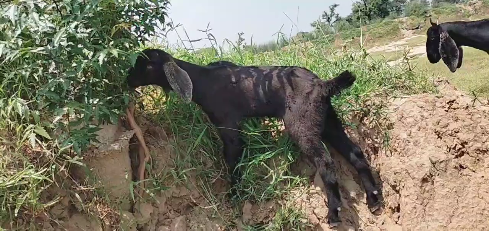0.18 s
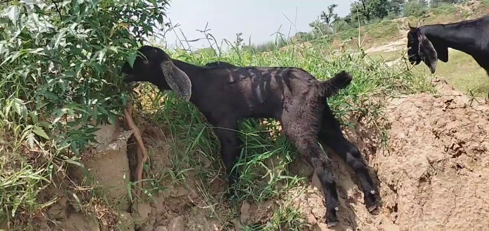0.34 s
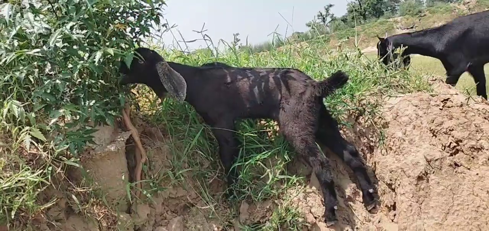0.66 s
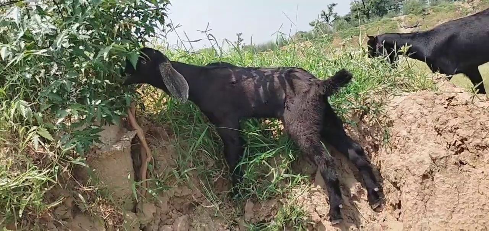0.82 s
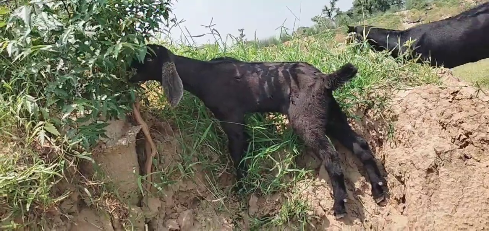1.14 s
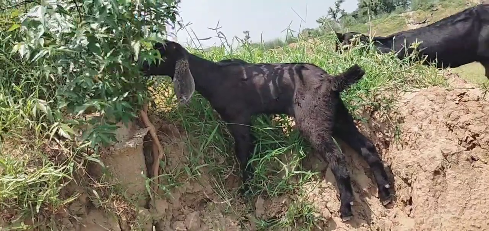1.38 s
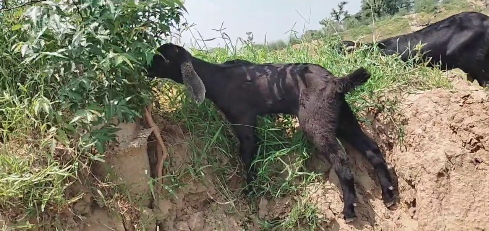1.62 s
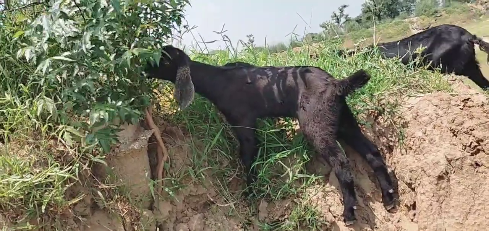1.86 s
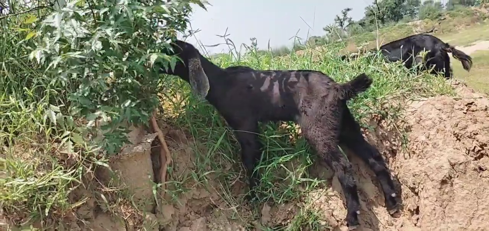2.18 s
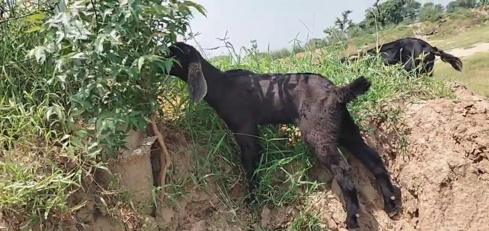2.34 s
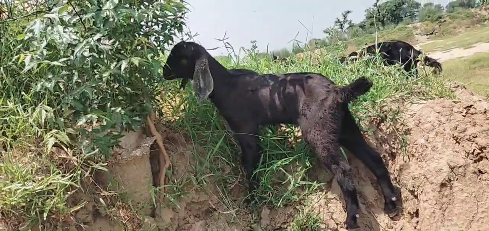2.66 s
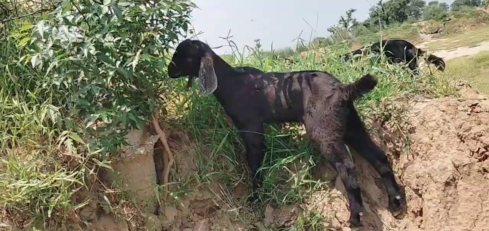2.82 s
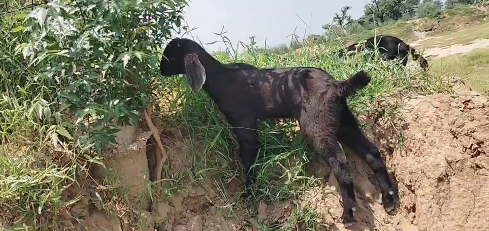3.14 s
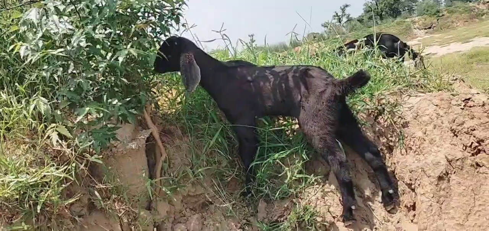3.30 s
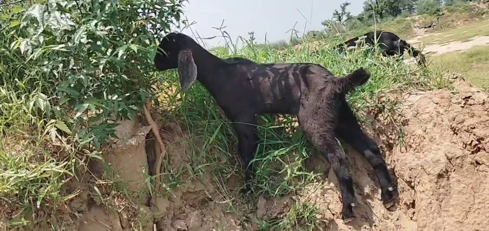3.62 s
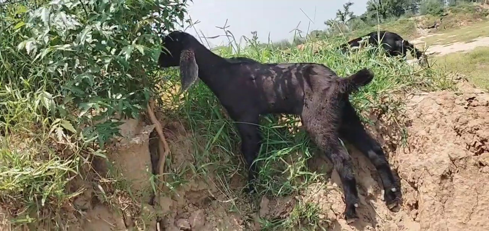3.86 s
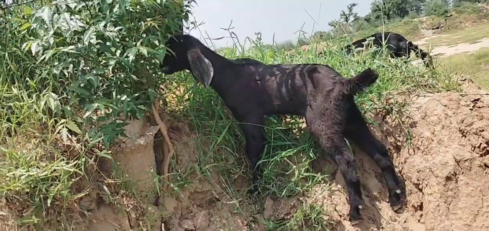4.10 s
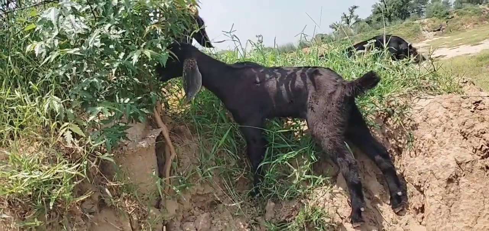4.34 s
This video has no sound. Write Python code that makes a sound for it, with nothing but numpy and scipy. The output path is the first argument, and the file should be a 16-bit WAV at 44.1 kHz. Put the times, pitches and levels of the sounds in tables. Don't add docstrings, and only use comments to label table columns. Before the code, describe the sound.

Leaves crackle and twigs snap as a goat browses, with one fluttering sneeze, a softer snort later, and thin bird whistles in quiet open air.

```python
import sys
import numpy as np
from scipy import signal
from scipy.io import wavfile
from scipy.ndimage import uniform_filter1d

SR = 44100
rng = np.random.default_rng(int(sys.argv[2]) if len(sys.argv) > 2 else 0)


def to_linear_factor(level_db):
    exponent = np.asarray(level_db, float) / 20
    return 10 ** exponent


def transcribe(signal):
    frames = np.atleast_2d(signal).T
    limited = np.clip(frames, -1, 1)
    pcm = np.round(limited * 32767).astype(np.int16)
    wavfile.write(sys.argv[1], SR, pcm)


N = 197656


def rms_one(x):
    return x / np.sqrt(np.mean(x ** 2) + 1e-20)


def highpass(x, hz):
    return signal.sosfilt(signal.butter(2, hz, "high", fs=SR, output="sos"), x)


def in_time(rows):
    s, *columns = np.transpose(rows)
    return [np.interp(np.arange(N) / SR, s, column) for column in columns]


def drift(rate_hz):
    r = np.exp(-80 * np.pi * rate_hz / SR)
    chance = rng.standard_normal(N // 40 + 2002)
    slow = signal.lfilter([1], [1, -2 * r, r * r], chance)[2000:]
    return np.interp(np.arange(N) / 40, np.arange(len(slow)), rms_one(slow))


def resonate(x, hz, width_hz):
    r = np.exp(-np.pi * width_hz / SR)
    top = (1 - r * r) / 2 * np.array([1, 0, -1])
    return signal.lfilter(top, [1, -2 * r * np.cos(2 * np.pi * hz / SR), r * r], x)


def bands(sources, spectrum):
    edges = 30 * 2 ** np.arange(0, 9.2, 1 / 3)
    hz, level_db = np.transpose(spectrum)
    for k, (low, high) in enumerate(zip(edges, edges[1:])):
        centre = np.sqrt(low * high)
        if hz[0] < centre < hz[-1]:
            part = signal.sosfilt(signal.butter(2, [low, high], "band", fs=SR, output="sos"), sources[k % 2])
            yield to_linear_factor(np.interp(np.log(centre), np.log(hz), level_db)) * part


def add(out, s, x):
    i = round(s * SR)
    out[i:i + len(x)] += x[:N - i]


# pitch in Hz, level in dB per Hz.
AIR_SPECTRUM = [(18, -44), (30, -7.5), (112, 5.5), (355, -3.5), (461, -3.5), (2120, -4), (2750, -11),
                (4190, -8.5), (6050, -23), (8080, -17.5), (11400, -28), (14800, -21.5), (16000, -27)]


def air():
    noise = rng.standard_normal((2, N))
    return to_linear_factor(-71.5) * rms_one(sum(to_linear_factor(1.36 * drift(24.0)) * x for x in bands(noise, AIR_SPECTRUM)))


# time in seconds, level in dB.
INSECT_LEVEL = [
    (0, -88),
    (.75, -95),
    (.9, -77.5),
    (1.5, -89),
    (2.55, -87.5),
    (2.75, -76.5),
    (3.55, -78.5),
    (3.72, -89),
    (4.48, -82),
]


def insects():
    level_db, = in_time(INSECT_LEVEL)
    level_db = level_db + 1.0 + 0.5 * drift(2.5)
    hiss = resonate(resonate(rng.standard_normal(N), 8240, 1500), 8360, 2100)
    return to_linear_factor(level_db) * rms_one(hiss)


def whistle(rows, overtones=(), rough=0.37, fade_s=0.003, trill=0):
    s, hz, level_db = np.transpose(rows)[:3]
    t = np.arange(s[0], s[-1], 1 / SR)
    waver, shake = (rms_one(uniform_filter1d(rng.standard_normal(len(t)), size=150)) for k in range(2))
    pitch_hz = np.interp(t, s, hz) * (1 + 0.025 * rough * waver)
    phase = 2 * np.pi * np.cumsum(pitch_hz) / SR
    tone = np.sin(phase) + sum(to_linear_factor(db) * np.sin(k * phase) for k, db in overtones)
    pulse = 1 - trill * np.cos(2 * np.pi * 85 * (t - s[0]))
    fade = np.clip(np.minimum(t - s[0], s[-1] - t) / fade_s, 0, 1)
    return np.sqrt(2) * to_linear_factor(np.interp(t, s, level_db)) * tone * (1 + rough * shake) * pulse * fade


def slide(length, from_hz, to_hz, db, change_db):
    u = np.linspace(0, 1, num=30)
    hz = to_hz + (from_hz - to_hz) * np.exp(-u / 0.223)
    return np.transpose([length * u, hz, db + change_db * (u - 0.5)])


# start in seconds,
# length in seconds, first pitch in Hz, last pitch in Hz, level in dB.
STRAIGHT_GLIDES = [(0.087, 0.05, 4060, 3780, -68.5), (0.092, 0.059, 2055, 2025, -70),
                   (0.139, 0.012, 4400, 3920, -64.5), (.149, 0.014, 4270, 4050, -67),
                   (0.055, .022, 4810, 3600, -73), (0.059, 0.015, 4700, 4750, -72),
                   (0.076, 0.0086, 3950, 4230, -63), (0.112, 0.015, 4710, 4470, -67),
                   (0.168, 0.018, 5250, 5050, -76), (.307, .011, 4650, 4750, -73), (.337, 0.014, 4700, 4550, -81),
                   (0.416, .018, 3990, 3450, -68), (0.442, .02, 5350, 4950, -66), (.55, .012, 4670, 4800, -71),
                   (0.746, 0.027, 4600, 3450, -72.5), (0.781, 0.021, 4560, 5100, -74),
                   (0.804, .044, 1405, 1497, -69), (0.83, 0.047, 5900, 5700, -77),
                   (0.416, 0.022, 4420, 4120, -64), (0.452, 0.014, 3990, 4800, -63), (0.83, .03, 3900, 3350, -73),
                   (1.02, .033, 4580, 4820, -74), (1.721, 0.018, 4400, 4400, -74), (1.645, 0.02, 4750, 4830, -83),
                   (1.67, 0.014, 5450, 5750, -86), (1.756, .018, 5300, 4900, -80),
                   (2.032, 0.013, 5400, 5100, -73), (2.164, 0.014, 3880, 4270, -74),
                   (3.626, 0.025, 2834, 2080, -67), (3.735, 0.1, 2040, 2203, -74),
                   (3.993, .025, 1850, 1820, -60.5), (4.046, 0.087, 2920, 2830, -69),
                   (4.122, .034, 1794, 1790, -65), (4.197, 0.02, 4130, 3880, -64),
                   (4.223, 0.013, 5170, 4200, -65), (4.234, .03, 4960, 4720, -69), (4.31, 0.021, 2700, 5000, -73),
                   (4.324, 0.014, 2430, 3580, -71), (3.433, 0.032, 2080, 2450, -70),
                   (4.378, 0.048, 5650, 4900, -78), (3.852, .045, 3300, 2900, -86)]


def straight_glides(out):
    for s, length, from_hz, to_hz, db in STRAIGHT_GLIDES:
        add(out, s, whistle([(0, from_hz, db), (length, to_hz, db)], rough=0.44, fade_s=0.0031))


# start in seconds, length in seconds, first pitch in Hz, last pitch in Hz, level in dB.
TWITTER_NOTES = [(.905, .022, 3450, 3370, -71.5), (3.455, .028, 2760, 2760, -66.5),
                 (3.266, .03, 3400, 3480, -66), (3.179, .038, 7200, 7120, -75),
                 (3.232, .046, 7150, 7280, -73), (4.222, .014, 3250, 3150, -72),
                 (2.048, .018, 3700, 3400, -71), (1.1, .011, 4570, 4650, -70),
                 (2.353, .0083, 4600, 4700, -75), (2.622, .027, 4700, 4800, -74),
                 (4.113, .01, 4850, 4850, -69), (4.383, .012, 4950, 4900, -75),
                 (4.468, .012, 4200, 4050, -66), (3.669, .05, 3000, 3770, -72),
                 (4.147, .04, 5600, 3880, -72)]
# start in seconds, length in seconds, foot pitch in Hz, top pitch in Hz, level in dB.
ARCHED_NOTES = [
    (1.534, 0.051, 5340, 5800, -80),
]


def twitter(out):
    for s, *call in TWITTER_NOTES:
        add(out, s, whistle(slide(*call, change_db=3.5), rough=0.27))
    u = np.linspace(0, 1, num=30)
    for s, length, foot_hz, top_hz, db in ARCHED_NOTES:
        hz = top_hz - (top_hz - foot_hz) * np.abs(2 * u - 1) ** 2.6
        add(out, s, whistle(np.transpose([length * u, hz, db + 0 * u]), rough=0.46, fade_s=0.0034))


# time in seconds, pitch in Hz, level in dB.
BENT_CALLS = [
    [(.357, 5120, -74), (.374, 4010, -71), (.388, 3930, -78), (.402, 3960, -63), (.409, 3650, -60)],
    [(.407, 4410, -64), (.416, 5510, -68), (.434, 5610, -69), (.441, 5100, -63), (.45, 3750, -57)],
    [(.482, 3500, -67), (.495, 4350, -74), (.506, 4850, -71), (.512, 4600, -64.5), (.522, 3900, -61)],
    [(1.65, 3510, -82), (1.664, 4900, -79), (1.672, 5250, -79), (1.683, 4130, -84), (1.71, 4060, -77),
     (1.716, 3800, -78)],
    [(.925, 3850, -78), (.937, 4200, -78), (.952, 5300, -76)],
    [(1.02, 3650, -74), (1.037, 3900, -70), (1.06, 3450, -71)],
    [(1.064, 3280, -73), (1.071, 4010, -70), (1.08, 3460, -66), (1.103, 3650, -61)],
]


def bent_calls(out):
    for call in BENT_CALLS:
        add(out, call[0][0], whistle(call, rough=0.25, fade_s=0.0019))


# start in seconds, length in seconds, first pitch in Hz, last pitch in Hz, level in dB.
HARSH_CHIRPS = [
    (.786, 0.129, 2705, 2903, -64.5),
    (3.163, 0.1213, 2786, 2893, -63),
]
CHIRP_FADES = (0.022, .005)


def harsh_chirps(out):
    overtones = ((0.5, -16), (1.5, -17), (2, -22), (2.5, -19))
    for (s, *call), fade_s in zip(HARSH_CHIRPS, CHIRP_FADES):
        rows = slide(*call, change_db=-11.5)
        add(out, s, whistle(rows, overtones, rough=0.75, fade_s=fade_s, trill=0.25))


# time in seconds, pitch in Hz, level in dB.
SQUAWK_PATH = [
    (3.992, 2320, -66),
    (4.004, 2653, -60),
    (4.029, 2787, -63.5),
    (4.044, 2910, -64.5),
    (4.06, 2570, -70),
]


def squawk(out):
    add(out, SQUAWK_PATH[0][0], whistle(SQUAWK_PATH, ((2, -8.0), (3, -21.0)), rough=0.58))


# time in seconds, pitch in Hz, level in dB.
LONG_NOTE = [
    (4.191, 4300, -83),
    (4.22, 4330, -64),
    (4.255, 3255, -60.5),
    (4.28, 2870, -58.5),
    (4.309, 2370, -60.5),
    (4.351, 2160, -61),
    (4.388, 1842, -61.5),
    (4.44, 1500, -68.5),
]
# pitch of the note in Hz, octave against note in dB.
OCTAVE_LEVEL = [(1500, -3), (1900, -9), (2300, -10), (2420, -22), (2650, -15), (2900, -18), (3150, -40)]


def long_note(out):
    s, hz, level_db = np.transpose(LONG_NOTE)
    octave_db = level_db + np.interp(hz, *np.transpose(OCTAVE_LEVEL))
    add(out, s[0], whistle(LONG_NOTE, rough=0.29))
    add(out, s[0], whistle(np.transpose([s, 2 * hz, octave_db]), rough=0.23))


# time in seconds, pitch in Hz, level in dB.
PEEP_PATH = [
    (1.778, 5950, -97.5),
    (1.8, 6475, -87.5),
    (1.812, 6450, -98),
]
# start in seconds, how much louder in dB, how many times longer.
PEEP_REPEATS = [
    (.187, 9.9, 1.2),
    (.467, 19, 1.18),
    (1.776, 16, 1.03),
    (2.054, 15.4, .95),
    (2.33, 15, 0.86),
    (2.605, 14, 1.),
    (2.868, 15, 1.3),
    (3.152, 2, 1.),
]


def peeps(out):
    for s, louder_db, stretch in PEEP_REPEATS:
        rows = np.array(PEEP_PATH) * [stretch, 1, 1]
        add(out, s, to_linear_factor(louder_db) * whistle(rows, rough=0.17, fade_s=0.0061))


# start in seconds, how much louder in dB.
FALL_REPEATS = [
    (1.425, -8),
    (1.775, -13),
    (2.12, -8),
    (2.465, -2),
    (2.815, 3),
    (3.157, 5),
    (3.516, 2.5),
    (3.872, 0),
]


def falling_whistles(out):
    length_s, drop_s = 0.086, 0.012
    t = np.linspace(0, length_s, num=40)
    drop = np.exp(-t / drop_s)
    last_dip_hz = 250 * (t / length_s) ** 8
    hz = 3650 - 9800 * t + 2240 * drop - last_dip_hz
    rows = np.transpose([t, hz, -68.5 - 10.5 * drop])
    for s, louder_db in FALL_REPEATS:
        add(out, s, to_linear_factor(louder_db) * whistle(rows, rough=0.28, fade_s=0.004))


# start in seconds, peak level in dB, pitch in Hz.
DOUBLE_TICKS = [
    (0.08, -55.5, 7640),
    (0.983, -56.5, 7800),
    (1.8356, -49.5, 7700),
    (2.7367, -45, 7780),
    (3.631, -39, 8140),
    (4.436, -42.5, 8150),
]
# time in seconds, pitch in Hz, level in dB.
WARBLE_PATH = [
    (0, 3400, -80),
    (.003, 3900, -70.5),
    (.007, 3050, -65),
    (.009, 3660, -67.5),
    (.011, 4700, -69),
    (.014, 4750, -59),
    (.016, 4670, -83),
]


def ticks(out):
    t = np.arange(-0.002, 0.004, 1 / SR)
    top = np.exp(-(t / 0.0006) ** 2)
    tail = 0.08 * np.exp(-((t - 0.0012) / 0.0013) ** 2)
    mean_db = np.mean(DOUBLE_TICKS, axis=0)[1]
    for s, peak_db, hz in DOUBLE_TICKS:
        sweep = np.sin(2 * np.pi * (hz * t - 530000.0 * t ** 2))
        tick = to_linear_factor(peak_db) * sweep * (top + tail)
        add(out, s - 0.0004, tick)
        add(out, s - 0.0004 + 0.012, to_linear_factor(2.5) * tick)
        warble_db = 5.5 + 0.48 * (peak_db - mean_db)
        add(out, s + 0.0192, to_linear_factor(warble_db) * whistle(WARBLE_PATH, fade_s=0.001))


def birds():
    out = np.zeros(N)
    for caller in (ticks, falling_whistles, peeps, bent_calls, harsh_chirps, squawk, straight_glides, twitter, long_note):
        caller(out)
    t = np.arange(round(0.08 * SR)) / SR
    echoes = rng.standard_normal(len(t)) * np.exp(-t / 0.019) * (t > 0.002)
    return out + to_linear_factor(-36) * signal.fftconvolve(out, echoes)[:N]


def crackle(per_s, spread_db, clump_db):
    sizes = to_linear_factor(spread_db * np.minimum(rng.exponential(1, (2, N)), 5)) * rng.choice([-1, 1], (2, N))
    dice = rng.random((2, N))
    chance = per_s * to_linear_factor(clump_db * drift(25.0)) / SR
    return rms_one(sizes * (dice < chance))


# pitch in Hz, level in dB per Hz.
LEAF_SPECTRUM = [(180, -12), (300, -5), (498, -4), (575, -2.5), (1650, -1.5), (2780, -6), (4290, -10.5),
                 (9500, -30), (12400, -68), (20900, -120)]


def leaves():
    crackling = 0.74 * crackle(per_s=900, spread_db=5.0, clump_db=7.0)
    friction = crackling + rng.standard_normal((2, N)) * to_linear_factor(2.0 * drift(38.0))
    return rms_one(sum(to_linear_factor(1.85 * drift(24.0)) * x for x in bands(friction, LEAF_SPECTRUM)))


def dry_edges():
    grains = 0.7 * crackle(per_s=2000, spread_db=3.5, clump_db=5.0)[0] + rng.standard_normal(N)
    hiss = highpass(grains, 8000)
    hiss = rms_one(hiss + 0.26 * resonate(hiss, 15000, 1500))
    ringing = np.zeros(N)
    for hz in np.geomspace(9800, 15400, num=9):
        ringing += to_linear_factor(7.0 * drift(14.0)) * resonate(rng.standard_normal(N), hz, 130)
    return rms_one(hiss + 0.3 * rms_one(ringing))


def swells(rows, rise_s=0, rise_share=0):
    t, power = np.arange(N) / SR, 0
    for s, length, *levels_db in rows:
        rise = np.clip((t - s) / (rise_s + rise_share * length), 0, 1)
        shape = rise * np.exp(-(np.maximum(t - s, 0) / length) ** 3)
        power = power + (to_linear_factor(np.array(levels_db))[:, None] * shape) ** 2
    return power


# start in seconds, length in seconds, lower resonance in dB, upper resonance in dB.
GOAT_SNIFFS = [(1.518, 0.074, -65, -71), (1.835, 0.087, -70.5, -72), (1.97, 0.22, -68, -74),
               (2.187, 0.075, -63, -72), (2.39, 0.059, -52.5, -68), (2.496, .044, -69.5, -74),
               (2.554, 0.11, -64.5, -68.5), (2.666, 0.26, -66, -65.5), (2.84, 0.17, -65.5, -69),
               (2.94, 0.12, -60.5, -69), (3.038, 0.18, -60, -69), (3.176, 0.1, -64.5, -66),
               (3.244, 0.081, -66.5, -69), (3.625, 0.14, -68, -69), (3.733, .1, -63.5, -69),
               (4.087, 0.086, -70.5, -83)]


def sniffing():
    low_gain, high_gain = np.sqrt(swells(GOAT_SNIFFS, rise_share=0.13))
    flow = rng.standard_normal(N) * to_linear_factor(3.6 * drift(54.0))
    low = resonate(resonate(flow, 1370, 320), 1370, 320) + 0.24 * resonate(flow, 496, 150)
    high = resonate(resonate(flow, 2105, 300), 2105, 300)
    return low_gain * rms_one(low) - high_gain * rms_one(high)


# start in seconds, length in seconds, leaves in dB, dry edges in dB.
BUSH_TUGS = [
    (.294, 0.012, -66.5, -84),
    (.401, 0.039, -60.5, -67),
    (1.429, 0.062, -67.5, -80),
    (1.518, 0.067, -60.5, -78),
    (2.392, 0.078, -57.5, -76.5),
    (2.556, 0.15, -61.5, -79),
    (3.045, 0.15, -54.5, -71),
    (4.087, 0.028, -61, -84),
    (4.118, 0.047, -60.5, -81),
]
# start in seconds, length in seconds, leaves in dB, dry edges in dB.
BRANCH_SWAYS = [(.06, 0.15, -67.5, -78), (.423, 0.16, -69, -77), (.77, .18, -67.5, -83.5),
                (.975, .13, -69, -80), (1.194, 0.15, -65, -78), (1.765, 0.12, -74.5, -88),
                (1.845, 0.08, -64.5, -80), (1.935, 0.048, -70, -79), (1.96, 0.2, -64, -73),
                (2.19, 0.09, -62, -76), (2.258, .12, -65.5, -80), (2.496, 0.049, -67.5, -86),
                (2.67, 0.29, -60.5, -68), (2.93, 0.14, -66, -76), (3.176, 0.097, -60, -80),
                (3.244, 0.1, -65.5, -90), (3.342, 0.22, -70, -84), (3.523, 0.1, -66.5, -85),
                (3.625, 0.09, -63.5, -78), (3.733, 0.11, -69.5, -83), (3.925, 0.16, -63.5, -90),
                (4.232, 0.23, -63, -77), (4.43, 0.067, -65.5, -84)]


def browsing():
    power = swells(BUSH_TUGS, rise_s=0.0042) + swells(BRANCH_SWAYS, rise_share=0.14)
    leaf_gain, edge_gain = np.sqrt(power)
    return leaf_gain * leaves() + sniffing() + edge_gain * dry_edges()


# start in seconds, length in seconds, pitch in Hz, level in dB.
LEAF_SQUEAKS = [(2.687, .016, 11200, -81), (2.73, .035, 15400, -77), (2.762, .012, 12000, -83),
                (2.778, .035, 15400, -75), (2.848, .02, 13700, -82), (2.815, .016, 12200, -83),
                (2.74, .03, 14700, -81), (2.868, .014, 9700, -80), (2.87, .02, 15000, -84),
                (2.928, .05, 13700, -81), (3.05, .014, 10000, -80), (2.98, .014, 12300, -84),
                (2.984, .013, 11100, -79), (3.01, .04, 11000, -82), (2.71, .12, 13600, -84)]


def squeaks():
    out = np.zeros(N)
    for s, length, hz, db in LEAF_SQUEAKS:
        noise, chance = rng.standard_normal((2, 3000))
        grains = noise * to_linear_factor(4.2 * rms_one(uniform_filter1d(chance, size=90)))
        width_hz = 0.03 * hz
        ring = resonate(resonate(grains, hz, width_hz), hz, width_hz)[:round(length * SR)]
        add(out, s, to_linear_factor(db + 6.5) * rms_one(ring) * np.hanning(len(ring)) ** 0.5)
    return out


# start in seconds, peak level in dB, pitch in Hz.
LEAF_FLICKS = [(1.9883, -56, 6910), (2.2096, -57, 15000), (2.2135, -60, 10500), (2.283, -54, 9520),
               (2.2835, -66, 13500), (2.5863, -64, 6510), (2.6396, -53, 9900), (2.6796, -67, 10000),
               (3.0088, -57, 14200), (3.0472, -54, 8560), (3.048, -60, 14000), (3.226, -59, 15000),
               (3.2942, -65, 7810), (1.099, -62, 14500)]


def flicks():
    out, t = np.zeros(N), np.arange(round(0.006 * SR)) / SR
    for s, peak_db, hz in LEAF_FLICKS:
        add(out, s, to_linear_factor(peak_db + 0.5) * np.sin(2 * np.pi * hz * t) * np.exp(-t / 0.0004))
    return out


# start in seconds, peak level in dB, pitch in Hz, dry edge in dB.
TWIG_SNAPS = [(0.078, -53, 2180, -61), (0.299, -50, 2060, -65), (0.405, -40, 920, -47.5),
              (0.553, -46.5, 1480, -90), (1.438, -52, 910, -62), (1.455, -62, 910, -54),
              (1.513, -41, 1430, -82), (2.004, -42.5, 1670, -53), (2.05, -45, 1570, -67),
              (2.216, -42, 1510, -86), (2.284, -51, 1220, -55), (2.396, -36, 1210, -86),
              (2.568, -36, 1350, -91), (2.586, -42.5, 2600, -72), (2.639, -42, 2220, -55),
              (3.01, -62.5, 1380, -59), (3.104, -33.5, 1680, -64), (3.358, -50, 807, -81),
              (4.261, -70.5, 1150, -55.5), (1.024, -55, 7000, -62), (4.272, -70, 1500, -62),
              (1.943, -53, 2800, -80), (1.979, -62, 1480, -80), (2.012, -43.5, 2640, -70),
              (2.063, -43, 1520, -80), (2.09, -49, 1560, -80), (2.142, -56, 1510, -85),
              (2.197, -56, 1410, -80), (2.447, -57, 3840, -75), (2.509, -56, 1310, -94),
              (2.6048, -48, 1300, -85), (2.677, -45, 1290, -80), (2.726, -54, 2030, -80),
              (2.956, -50, 1360, -85), (3.159, -39, 1420, -80), (3.303, -49, 2120, -85)]


def snaps():
    out, t = np.zeros(N), np.arange(round(0.033 * SR)) / SR
    for s, peak_db, hz, edge_db in TWIG_SNAPS:
        splinters, crack = rng.standard_normal((2, len(t)))
        wood = resonate(resonate(splinters * np.exp(-t / 0.0055), hz, 1000), hz, 1300)
        edge = signal.lfilter([1, -0.75], [1], crack * np.exp(-t / 0.0023))
        add(out, s, to_linear_factor(peak_db - 7.0) * wood / np.abs(wood).max() + to_linear_factor(edge_db - 5.0) * edge)
    return out


def flap(hz):
    t = np.arange(round(0.03 * SR)) / SR
    swell = 2.88 * t / 0.0032 * np.exp(-t / 0.003)
    ring = -swell * np.sin(2 * np.pi * hz * t)
    return ring - swell * ring.sum() / swell.sum()


# start in seconds, peak level in dB, pitch of the nose cavity in Hz.
NOSTRIL_FLAPS = [(0.091, -59.5, 273), (0.142, -57.5, 238), (0.637, -57, 228), (0.736, -59, 237),
                 (1.025, -61.5, 225), (1.062, -60, 251), (1.211, -46, 242), (1.23, -52, 240),
                 (1.281, -53.5, 230), (1.309, -58.5, 310), (1.542, -50.5, 180), (2.268, -60.5, 234),
                 (2.396, -54.5, 410), (2.587, -57, 220), (2.766, -54.5, 244), (2.986, -49.5, 237),
                 (3.134, -50, 268), (3.09, -58, 120), (3.113, -57, 130), (3.161, -56, 140),
                 (3.18, -61, 290), (3.255, -58.5, 271), (3.537, -62, 300), (3.643, -62, 230),
                 (3.661, -59, 584), (3.696, -62, 280), (3.709, -63, 181), (3.714, -61, 597),
                 (3.957, -64, 520), (4.124, -60.5, 740), (3.997, -61, 245), (4.087, -60, 224)]


def flaps():
    out = np.zeros(N)
    for s, peak_db, hz in NOSTRIL_FLAPS:
        add(out, s - 0.001, to_linear_factor(peak_db + 1.36) * flap(hz))
    return out


# pitch in Hz, width in Hz, level in dB.
NOSE_RESONANCES = [(876, 25, -3.5), (1204, 260, 4), (1970, 155, 3), (2240, 107, 4.5), (3015, 254, 1.5),
                   (4050, 290, 5.5), (5020, 180, 2.5), (5800, 350, 3), (7000, 360, 2), (7800, 290, 6.5),
                   (8580, 380, 6), (9600, 410, 5), (10300, 270, -3), (14600, 810, 3.5)]


def blast(force, flutter, jet, first_s, last_s, cavity_hz, push, gate, nose_db):
    before, after = (force[0][0] - 0.002, -95, -95), (force[-1][0] + 0.014, -95, -95)
    jet_db, flutter_db = in_time([before] + force + [after])
    flaps_per_s, = in_time(flutter)
    turns = np.cumsum(flaps_per_s) / SR
    turns = turns - turns[round(first_s * SR)]
    starts = np.flatnonzero(np.diff(np.floor(turns))) / SR
    starts = starts[(starts > first_s - 0.001) & (starts < last_s)]
    thumps = np.zeros(N)
    for s, (louder, higher) in zip(starts, rng.standard_normal((30, 2))):
        thump = flap(cavity_hz * (1 + 0.13 * higher)) + push * flap(101)
        add(thumps, s, to_linear_factor(0.43 * louder) * thump)
    noise = rms_one(sum(bands(rng.standard_normal((2, N)), jet)))
    passage = np.zeros(N)
    for k, (hz, width_hz, db) in enumerate(NOSE_RESONANCES):
        passage += (-1) ** k * to_linear_factor(db) * resonate(noise, hz, width_hz)
    voiced = rms_one(noise + to_linear_factor(nose_db) * passage)
    high = highpass(voiced, 5500)
    cycle = np.cos(2 * np.pi * (turns - 0.9))
    chopped = (voiced * (1 + gate * cycle) + 0.46 * high * cycle) * to_linear_factor(0.78 * drift(130.0))
    return to_linear_factor(jet_db) * rms_one(chopped) + to_linear_factor(flutter_db + 7.0) * thumps


# time in seconds, air jet in dB, nostril flutter in dB.
SNORT_FORCE = [
    (3.04, -66, -58),
    (3.049, -53, -51),
    (3.06, -52, -49),
    (3.1, -54, -50),
    (3.112, -55, -58),
    (3.16, -61, -60),
]
# time in seconds, flaps per second.
SNORT_FLAP_RATE = [(3.03, 51), (3.121, 48.7)]
# pitch in Hz, level in dB per Hz.
SNORT_SPECTRUM = [(240, -58), (400, 5.5), (789, -45), (1290, 4), (1680, -0.5), (2150, -7.5), (4880, -30),
                  (6240, -115), (8240, -21), (16000, -49)]


def snort():
    return blast(SNORT_FORCE, SNORT_FLAP_RATE, SNORT_SPECTRUM, first_s=3.052, last_s=3.12,
                 cavity_hz=290, push=0.35, gate=0.3, nose_db=-3.0)


# time in seconds, air jet in dB, nostril flutter in dB.
SNEEZE_FORCE = [
    (1.1048, -50, -60),
    (1.1065, -38, -45),
    (1.122, -31.5, -44.5),
    (1.13, -29.5, -35),
    (1.16, -33.5, -39),
    (1.19, -38, -40),
    (1.209, -46.5, -42),
    (1.219, -57, -52),
    (1.3, -83, -60),
]
# time in seconds, flaps per second.
SNEEZE_FLAP_RATE = [(1.1, 114), (1.159, 87), (1.181, 81), (1.21, 55)]
# pitch in Hz, level in dB per Hz.
SNEEZE_SPECTRUM = [(240, -55), (400, 0.5), (553, -8.5), (893, -3), (1580, -6), (1990, -2), (2630, -8.5),
                   (4110, -6), (5430, -15), (11500, -23.5), (16000, -27)]


def sneeze():
    return blast(SNEEZE_FORCE, SNEEZE_FLAP_RATE, SNEEZE_SPECTRUM, first_s=1.1135, last_s=1.2,
                 cavity_hz=271.4, push=0.31, gate=0.24, nose_db=9.0)


def scene():
    blasts = sneeze() + snort()
    background = air() + insects()
    goat = browsing() + snaps() + flaps() + blasts
    return (background + goat + birds() + squeaks() + flicks())[None]


def top_cut(x):
    return signal.sosfilt(signal.butter(12, 15760, fs=SR, output="sos"), x)


def record(dry):
    cut = signal.sosfilt(signal.butter(4, 63, "high", fs=SR, output="sos"), dry)
    mix = signal.sosfilt(signal.cheby2(22, 60, 16250, fs=SR, output="sos"), cut)
    return top_cut(mix)


dry = scene()
out = record(dry)
transcribe(out)
```